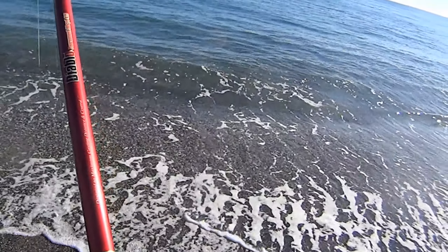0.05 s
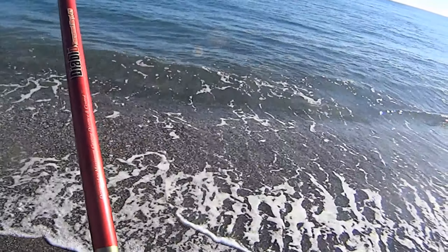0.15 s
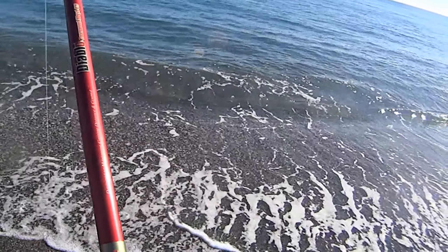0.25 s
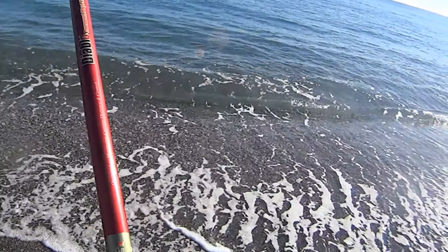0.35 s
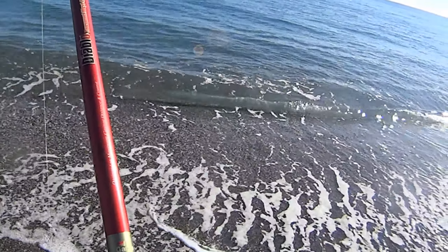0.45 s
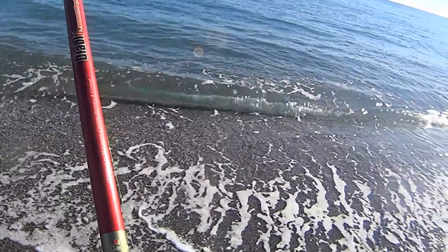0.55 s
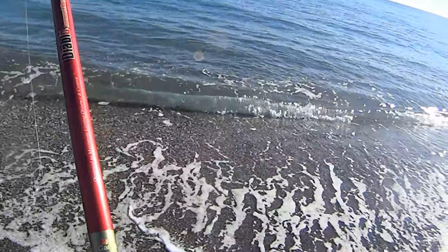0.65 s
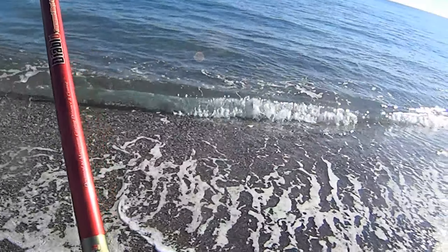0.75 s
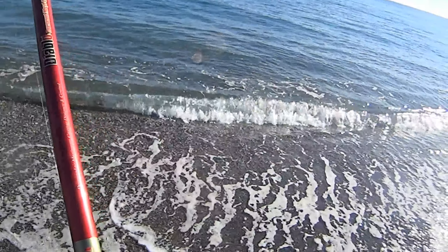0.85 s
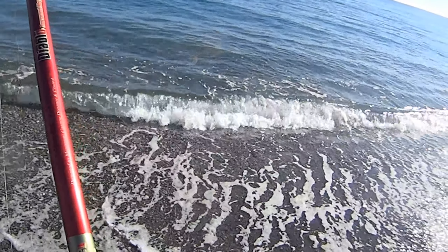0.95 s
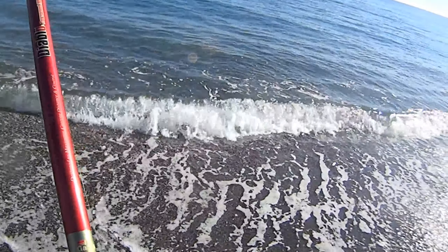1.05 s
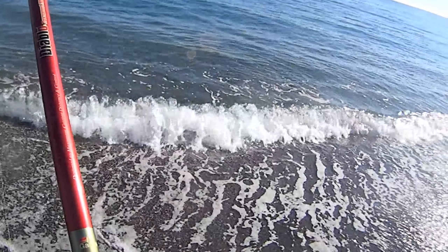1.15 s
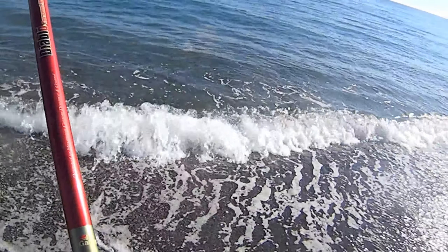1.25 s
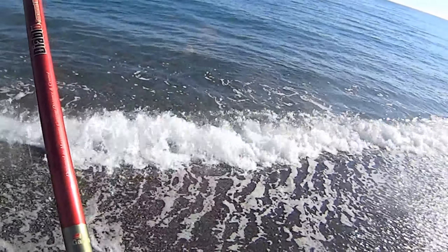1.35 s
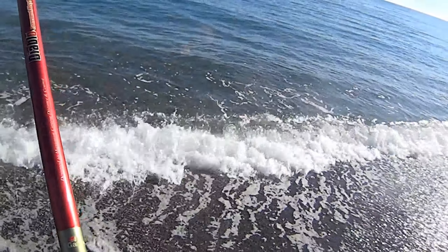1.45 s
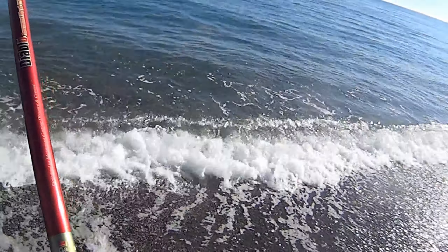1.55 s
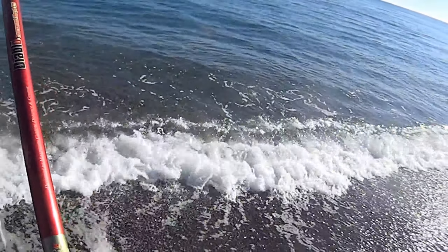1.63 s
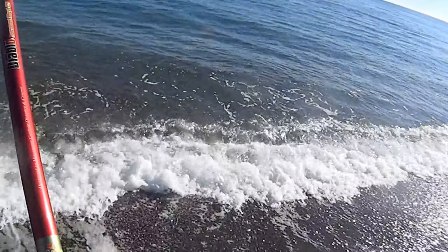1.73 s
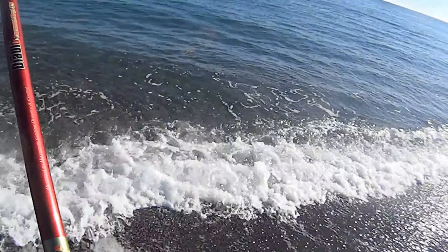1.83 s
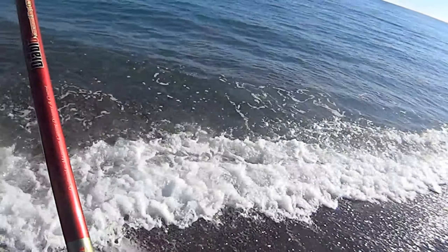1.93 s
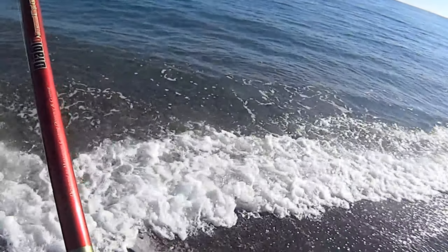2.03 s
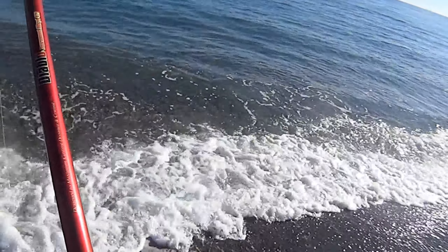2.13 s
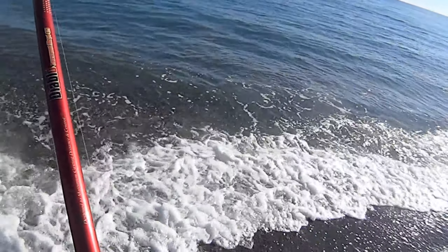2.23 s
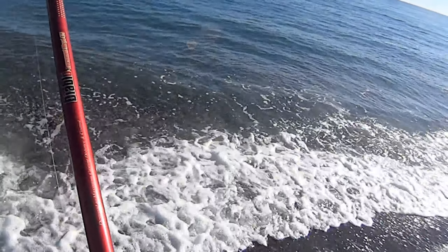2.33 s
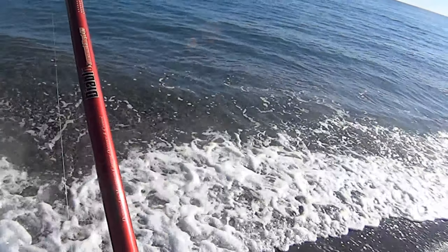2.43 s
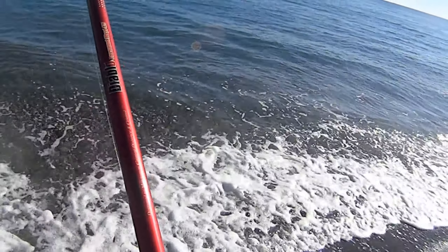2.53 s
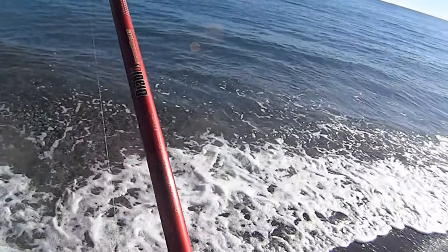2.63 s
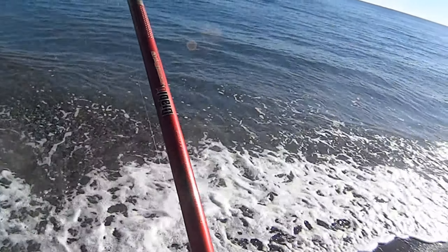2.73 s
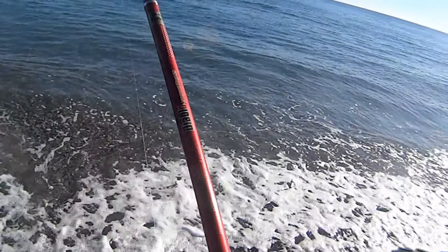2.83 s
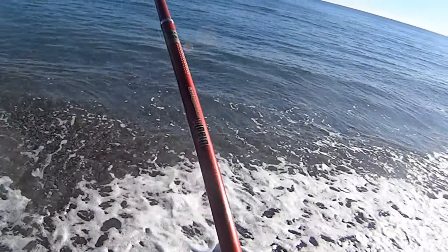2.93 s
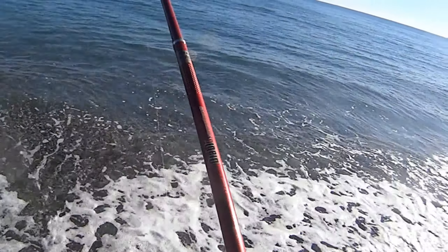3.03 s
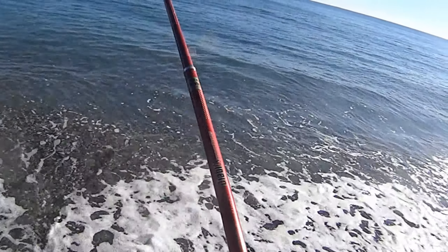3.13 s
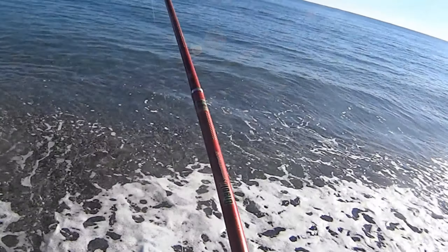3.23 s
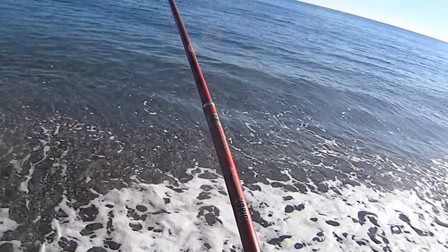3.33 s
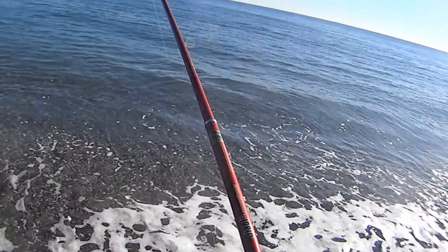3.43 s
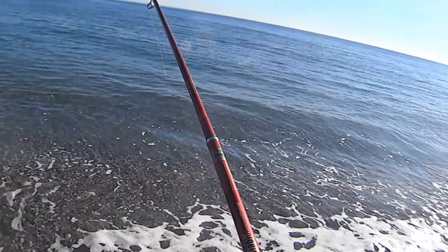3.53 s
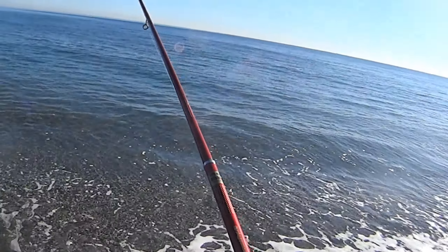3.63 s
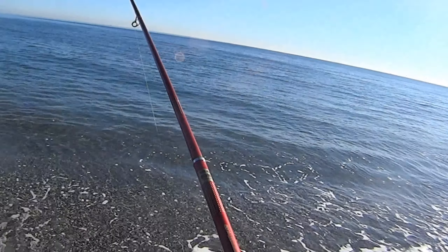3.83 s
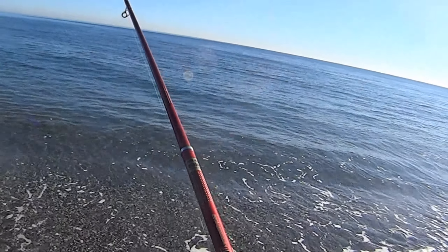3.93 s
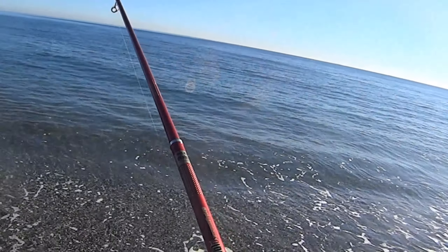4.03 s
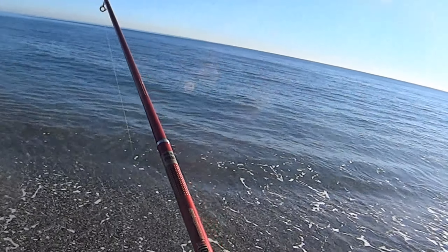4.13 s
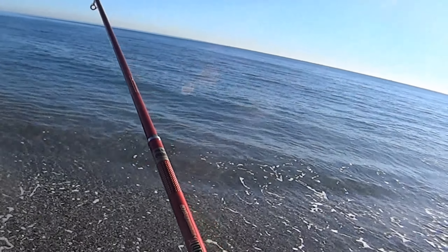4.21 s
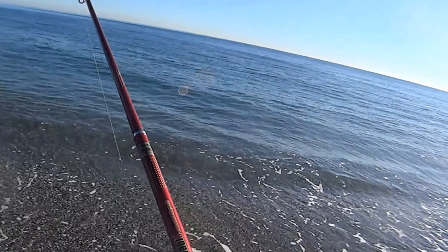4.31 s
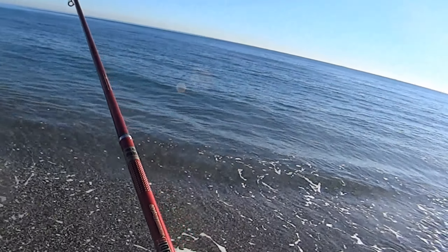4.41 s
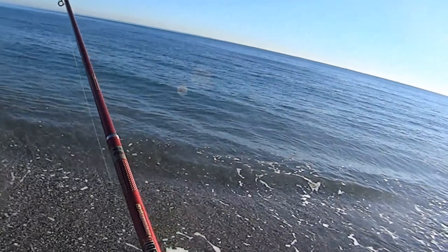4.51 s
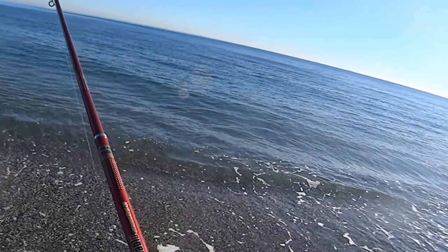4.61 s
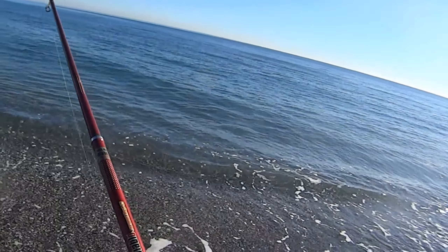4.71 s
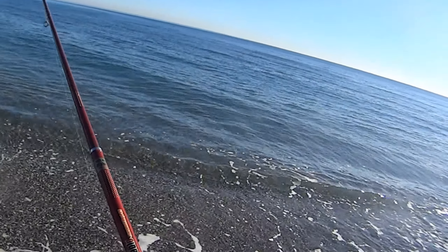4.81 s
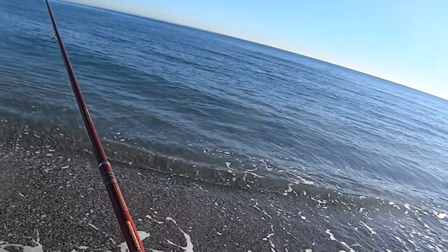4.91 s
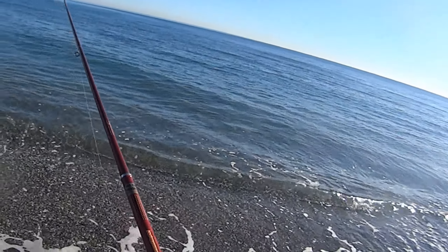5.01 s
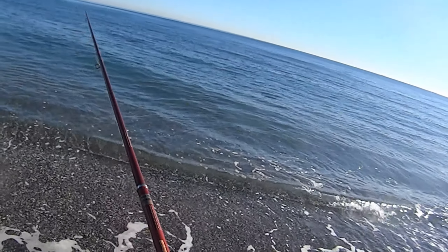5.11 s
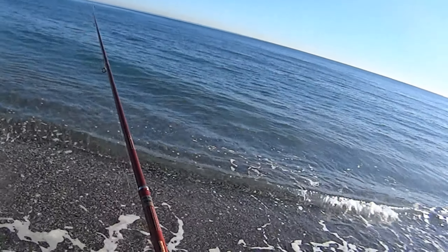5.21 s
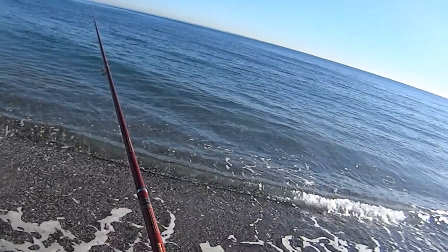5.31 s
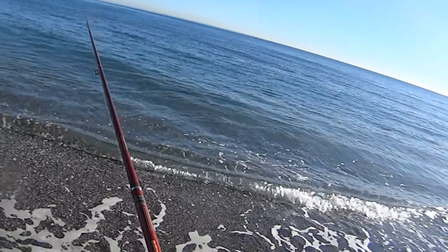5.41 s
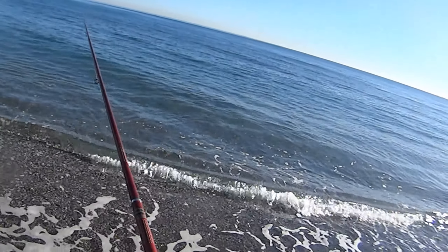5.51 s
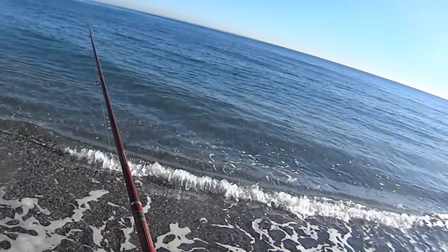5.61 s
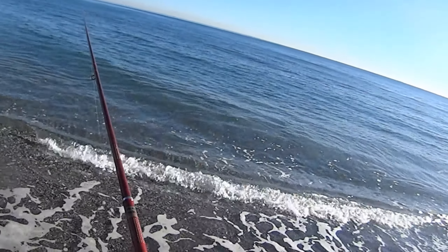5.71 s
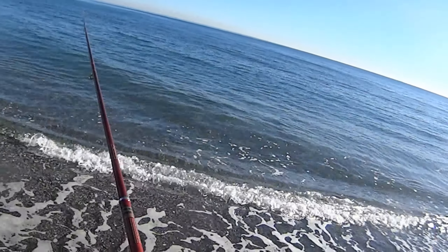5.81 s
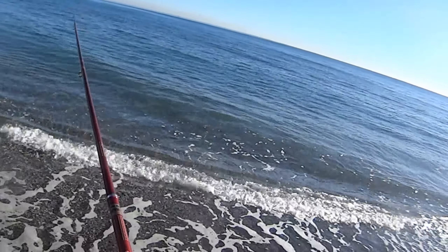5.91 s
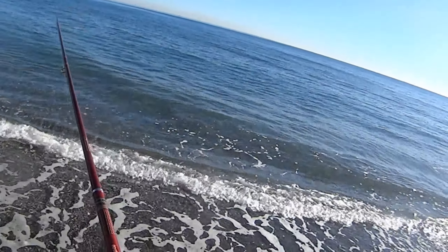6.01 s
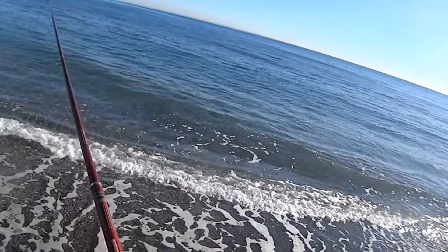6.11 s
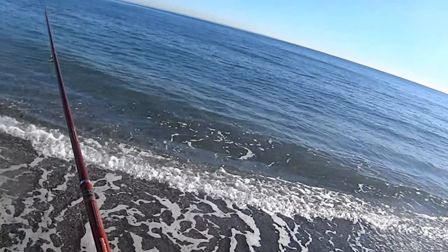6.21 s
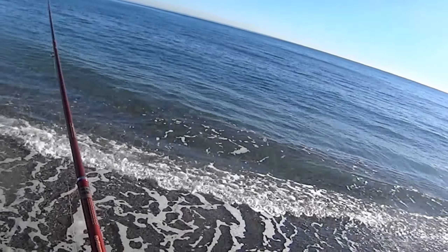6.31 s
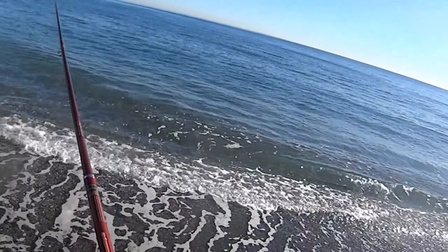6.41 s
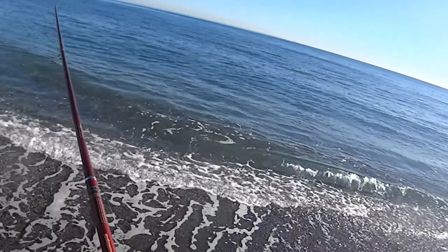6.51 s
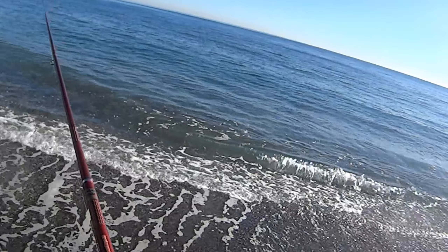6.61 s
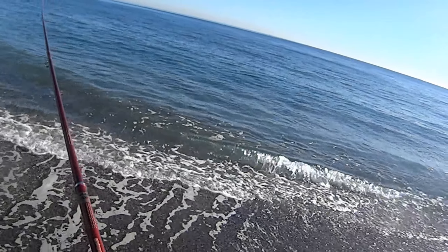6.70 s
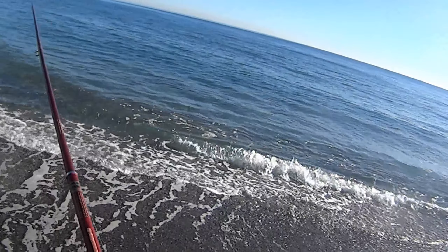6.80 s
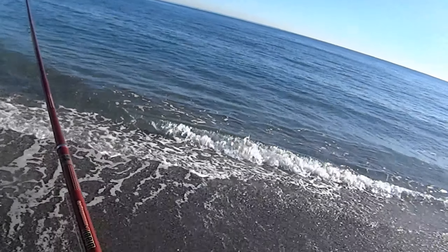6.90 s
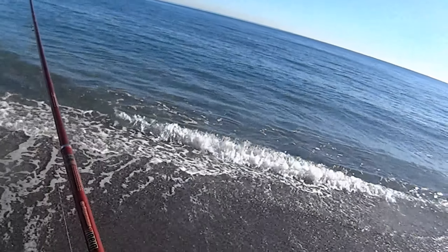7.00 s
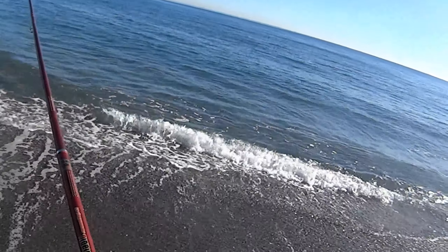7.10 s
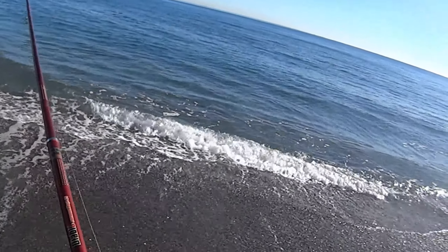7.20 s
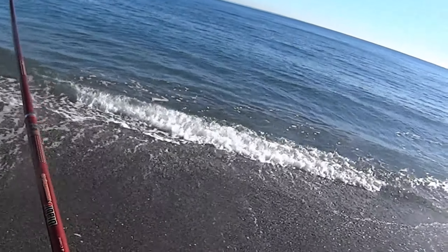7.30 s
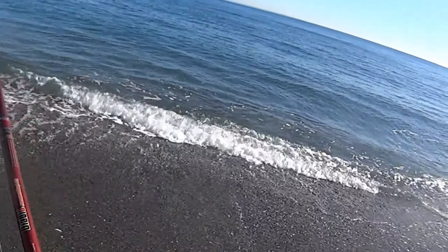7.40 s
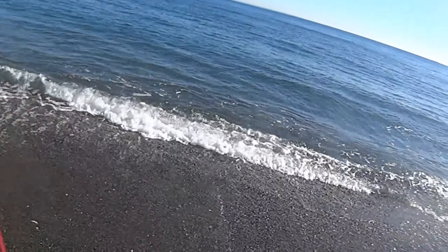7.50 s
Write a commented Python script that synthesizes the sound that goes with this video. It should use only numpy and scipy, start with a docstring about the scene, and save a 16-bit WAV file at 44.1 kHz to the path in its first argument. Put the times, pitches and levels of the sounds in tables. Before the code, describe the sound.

Close ratcheting reel clicks speed into a bright metallic whirr as one bigger wave, then gentler ones, wash and fizz on shingle.

```python
"""Small waves break on a shingle beach, one strong, then gentler ones, and drain back through the pebbles.
Their water is ringing bubbles and filtered noise; their foam and pebbles are dense random clicks.
Right by the microphones an angler winds in line: a ratchet of short noise bursts and spring pings,
slow at first, then a fast whirr. The tackle knocks now and then as clicks ringing a few modes.
The camera's housing adds a hollow ring; far sea and a light breeze on its two ports are filtered noise."""
import sys
import numpy as np
from scipy import signal
from scipy.fft import rfft, irfft, next_fast_len
from scipy.io import wavfile

SR = 44100
rng = np.random.default_rng(int(sys.argv[2]) if len(sys.argv) > 2 else 0)


def log_audio(samples):
    """Write samples as a 16-bit WAV file to the path given in sys.argv[1]."""
    # one column per channel
    frames = np.atleast_2d(samples).T
    # limit to full scale, then quantise
    limited = np.clip(frames, -1, 1)
    pcm = np.round(limited * 32767).astype(np.int16)
    wavfile.write(sys.argv[1], SR, pcm)


N = 332943
TIME = np.arange(N) / SR  # s
SIZE = next_fast_len(N + 8192, True)  # transform length, with room for filter tails
BINS = np.maximum(np.arange(SIZE // 2 + 1) * SR / SIZE, 1)  # Hz

# spectrum of the pawl on the teeth: [f/Hz, relative level/dB per Hz]
PAWL_SPECTRUM = [(1000, -27), (2300, -14), (3000, -3.5), (4400, -5), (5400, -3), (6400, 2), (7200, -4.5),
                 (8000, -9), (10600, -6), (11500, -16.5)]


def from_db(db):
    """Decibels to gain."""
    return 10 ** (np.asarray(db) / 20)


def rms_one(x):
    """Scale to rms 1, over both channels together."""
    return x / np.sqrt(np.mean(x ** 2) + 1e-20)


def in_time(rows):
    """The columns of a curve, read at every sample."""
    s, *columns = np.transpose(rows)
    return [np.interp(TIME, s, column) for column in columns]


def per_bin(points):
    """A table over log frequency, read at every bin."""
    hz, value = np.transpose(points)
    return np.interp(np.log(BINS), np.log(hz), value)


def colour(x, spectrum):
    """Causal (minimum-phase) filter with the given spectrum, by folding its cepstrum; rms 1."""
    cepstrum = irfft(np.log(from_db(per_bin(spectrum))), SIZE)
    cepstrum[1:SIZE // 2] *= 2
    cepstrum[SIZE // 2 + 1:] = 0
    response = np.exp(rfft(cepstrum))
    return rms_one(irfft(rfft(x, SIZE) * response, SIZE)[..., :N])


def noise_pair():
    """White noise as a (common, differing) pair of channels."""
    return rng.standard_normal((2, N))


def drift(rate):
    """Smooth chance of rms 1 that changes about `rate` times a second."""
    step = 40  # samples between the slow values
    r = np.exp(-2 * np.pi * rate * step / SR)
    slow = signal.lfilter([1], [1, -2 * r, r * r], rng.standard_normal(N // step + 2002))
    slow = rms_one(slow[2000:])  # the filter has settled
    return np.interp(np.arange(N) / step, np.arange(len(slow)), slow)


def ring(clicks, hz, t60):
    """A unit click sets a damped cosine ringing, falling 60 dB in t60 s, with little below its pitch."""
    r = from_db(-60 / (t60 * SR))
    w = 2 * np.pi * hz / SR
    return signal.lfilter([.5, 0, -.5], [1, -2 * r * np.cos(w), r * r], clicks + 1e-18)


def dying(strikes, decay_s):
    """Each strike starts an envelope that dies away exponentially at once."""
    return signal.lfilter([1], [1, -np.exp(-1 / (decay_s * SR))], strikes + 1e-18)


def clicks_at(times, sizes):
    """Single clicks at the given times."""
    places = np.clip(np.round(times * SR).astype(int), 0, N - 1)
    return np.bincount(places, sizes, N)


def grains(per_s, spread_db):
    """Random clicks, many small and few large, as a (common, differing) pair of steady power."""
    born = rng.random(N) < per_s / SR
    sizes = from_db(spread_db * np.minimum(rng.exponential(1, N), 4))
    return rms_one(born * sizes * noise_pair() / np.sqrt(per_s))


def far_sea():
    """The sea farther out is a steady low noise."""
    spectrum = [(30, -3.5), (90, -0.5), (200, -4.5), (500, -2.5), (1000, -2), (3000, -18)]  # far sea: [f/Hz, relative level/dB per Hz]
    return from_db(-61.0) * colour(noise_pair(), spectrum)


def breeze():
    """Light moving air rumbles on the ports, a very low noise that gusts."""
    # breeze on the ports, before the gusts: [t/s, level/dB]
    strength = [(0, -73), (4.1, -63.5), (5.5, -64), (6.6, -54)]
    # its rumble: [f/Hz, relative level/dB per Hz]
    spectrum = [(20, 6), (35, -5.5), (70, -18), (150, -17), (500, -54)]
    gusts_db = 2.5 * drift(6)
    return from_db(in_time(strength)[0] + gusts_db) * colour(noise_pair(), spectrum)


def housing(x):
    """The camera's shell and cavities resonate and lift a few bands."""
    # resonances of the housing: [f/Hz, width/Hz, lift/dB]
    resonances = [(1073, 40, 2), (1365, 105, 15.5), (2330, 160, 3.5), (3270, 960, 3.5), (5230, 650, 3.5)]
    for hz, width_hz, db in resonances:
        b, a = signal.iirpeak(hz, hz / width_hz, fs=SR)
        x = x + (from_db(db) - 1) * signal.lfilter(b, a, x)
    return x


def ports(pair):
    """Two ports hear the common part with their own level and phase, the differing part in opposite sign."""
    # likeness of the two ports: [f/Hz, likeness 0 to 1]
    likeness = [(40, 1), (400, 0.35), (700, 0.18), (1100, 0.56), (1380, 0.91), (1850, 0.15), (2500, 0.92),
                (3100, 1), (3550, 0.78), (5400, 0.87), (6500, 0.92), (7700, 0.56), (8500, 0.66),
                (11000, 0.74)]
    # level between the ports: [f/Hz, left minus right level/dB]
    balance = [(300, 0), (750, 1.5), (1400, -1), (2000, -1.3), (2600, -2), (3350, -6.5), (4400, -2),
               (6400, -3.5), (8000, -2), (11000, -2)]
    # phase between the ports: [f/Hz, lead of the left/rad]
    lead = [(100, -0.27), (380, -1.46), (600, -2.5), (1500, -0.98), (1900, -1.77), (3300, -1), (3600, -0.4),
            (7000, 0.6), (8200, -0.1)]
    common, differing = rfft(pair, SIZE)
    alike = np.clip(per_bin(likeness), 0, 1)
    lead_rad = per_bin(lead)
    sign = np.array([[1], [-1]])  # left, right
    both = np.sqrt((1 + alike) / 2) * common + sign * np.sqrt((1 - alike) / 2) * differing
    both = both * from_db(sign * per_bin(balance) / 2) * np.exp(.5j * sign * lead_rad)
    centre = np.sqrt((1 + alike * np.cos(lead_rad)) / 2)  # the sum of the two keeps its level
    return irfft(both / centre, SIZE)[:, :N]


def knocks():
    """The tackle clacks against the rod, ringing short modes; some contacts also set off a duller thud."""
    # contacts of the tackle: [t/s, strength/dB, thud against clack/dB]
    contacts = [(0.251, -33, -23), (2.0193, -11.5, -24), (2.0244, -7, -13), (4.608, -31, -2),
                (4.799, -23.5, 2.5), (4.8032, -34.5, -6), (6.0885, -17, -39), (6.91, -28, 3),
                (7.18, -31.5, 3.5), (7.434, -27.5, -2)]
    # modes of the clack, then of the thud: [f/Hz, level/dB, t60/s]
    clack_modes = [(1650, -8.5, 0.0061), (2440, 0.5, 0.0039), (2740, -18, 0.0036), (5500, -15, 0.0027)]
    thud_modes = [(330, -13, 0.0051), (570, -18, 0.011), (1096, -11, 0.028), (1300, -7, 0.02)]
    s, strength_db, thud_db = np.transpose(contacts)
    hard = clicks_at(s, from_db(strength_db))
    soft = clicks_at(s, from_db(strength_db + thud_db))
    clack = sum(ring(hard, hz, t60) * from_db(db) for hz, db, t60 in clack_modes)
    thud = sum(ring(soft, hz, t60) * from_db(db) for hz, db, t60 in thud_modes)
    small_and_blunt = signal.butter(2, [900, 7500], "band", fs=SR, output="sos")
    right = signal.sosfilt(small_and_blunt, clack) + thud
    left = np.interp(TIME - .00008, TIME, right)  # the left port hears it a little later
    return np.array([left, right])


def scrapes(strikes, decay_s):
    """Each strike of the pawl is a tiny burst of metallic chatter."""
    return dying(strikes, decay_s) * noise_pair()


def catches():
    """Now and then the pawl snaps down harder and shorter."""
    # hard catches of the pawl: [t/s, relative level/dB]
    snaps = [(0.0173, -23.5), (0.407, -30), (0.5030, -22), (4.353, -22), (4.578, -28), (7.3677, -18),
             (7.4784, -11), (7.4887, -18)]
    s, snap_db = np.transpose(snaps)
    bursts = scrapes(clicks_at(s, from_db(snap_db)), decay_s=0.0017)
    return from_db(-60.5) * colour(bursts, PAWL_SPECTRUM)


def reel():
    """The pawl drops off one tooth after another, weak or strong; its spring pings along."""
    # winding speed: [t/s, mean rate/ticks per s]
    winding = [(0.0, 54), (0.97, 75.1), (1.95, 76), (2.08, 76.1), (2.39, 88.2), (2.59, 112), (2.82, 122),
               (3.26, 119), (3.59, 133), (3.81, 123), (4.0, 130), (4.18, 111), (4.75, 119), (5.0, 145),
               (5.23, 148), (5.49, 165), (5.78, 212), (6.33, 171), (6.52, 184), (6.9, 168), (7.04, 180),
               (7.55, 172)]
    # how hard the pawl bears on the teeth: [t/s, level/dB]
    pressure = [(0, -2), (.24, 1.5), (.55, 1), (.78, 5), (2.35, 0.5), (2.7, 1.5), (3.3, 1.5), (3.75, -1.2),
                (4.6, -3), (5.3, 0), (5.85, 2), (6.2, -0.5), (7.5, 0.3)]
    # louder with speed: reference at 100 ticks per s ahead of the mix below, and gain per doubling
    reference_db, db_per_octave = -45.5, 4
    ping_follows = 0.95  # a harder pawl rings its spring more: extra dB per dB of pressure

    per_s, pressure_db = in_time(winding)[0], in_time(pressure)[0]
    level_db = reference_db + db_per_octave * np.log2(per_s / 100) + pressure_db
    per_s = per_s + .07 * (per_s - per_s.min()) * drift(10)  # the hand is less even when fast
    teeth = np.flatnonzero(np.diff(np.floor(np.cumsum(per_s) / SR)))
    late, hard, sharp, springy = rng.standard_normal((len(teeth), 4)).T
    times = TIME[teeth] + 0.00027 * late
    force = from_db(level_db[teeth]) / np.sqrt(per_s[teeth])

    # the body and the bright edge of a tick vary each on their own
    body = scrapes(clicks_at(times, force * from_db(1.8 * hard)), decay_s=.002)
    edge = scrapes(clicks_at(times, force * from_db(1.6 * sharp)), decay_s=.0022)
    low, high = (signal.butter(4, 7500, kind, fs=SR, output="sos") for kind in ("low", "high"))
    chatter = colour(signal.sosfilt(low, body) + signal.sosfilt(high, edge), PAWL_SPECTRUM)

    spring_hz = 5950 * np.exp(0.071 * drift(22))  # the pitch wanders from tooth to tooth
    ping_force = force * from_db(2.4 * springy + ping_follows * pressure_db[teeth])
    swell = dying(clicks_at(times, ping_force), decay_s=0.0014)
    swell = dying(swell, decay_s=0.00082)  # the second decay rounds the onset
    tone = np.sin(2 * np.pi * np.cumsum(spring_hz) / SR)
    ping = rms_one(swell * tone) * np.array([[1], [0]])  # common part only
    loudness = np.sqrt(np.mean(from_db(level_db) ** 2))
    return (from_db(-3.5) * chatter + from_db(-5.5) * ping) * loudness


def gulps():
    """Big pockets of air gulp as a crest folds: each swells and rings briefly under the water."""
    # gulps: [t/s, f/Hz, peak level/dB]
    pockets = [(1.80, 241, -47), (5.263, 248, -50), (5.774, 268, -46.5), (6.695, 412, -48.5)]
    out = 0
    for s, hz, peak_db in pockets:
        age = np.maximum(TIME - s, 0)
        swell = age * hz / 1.8  # fullest after 1.8 cycles
        out = out + from_db(peak_db) * swell * np.exp(1 - swell) * np.sin(2 * np.pi * hz * age)
    return out


def arch(age, length_s):
    """Half a sine: a crest folds over, bit by bit, and runs out."""
    return np.sin(np.pi * np.clip(age / length_s, 0, 1))


def build_and_fade(age, build_s, fade_db_per_s):
    """A steady rise to 1, then a steady loss of decibels."""
    return np.clip(age / build_s, 0, 1) * from_db(-fade_db_per_s * np.maximum(age - build_s, 0))


def surf():
    """Gains of plunge, splash and fizz: each wave ripples in, breaks, runs up, leaves foam; powers add."""
    # crests, each one arch of sound, with levels ahead of the mix: [start t/s, length/s, approach ripple
    # level/dB, plunge of trapped air level/dB, splash level/dB, fizz level/dB, foam left behind level/dB]
    crests = [(0.51, 1.88, -52.5, -51.5, -38.5, -29, -38.5), (5.076, 1.22, -47.5, -58.5, -43.5, -37, -41),
              (6.535, 0.86, -48.5, -57.5, -44.5, -39, -41), (7.362, 0.42, -53, -63, -43, -37.5, -43)]
    drain_gurgle_db, drain_fizz_db = -67, -53  # water always drains through the pebbles
    # a coming wave ripples over the shallows, louder until it breaks, and the pebbles it stirs fizz
    ripple_rise_db_per_s, ripple_fizz_db = 13, 4
    plunge_lag_s = 0.13  # air is trapped once the crest has folded over
    # the broken wave runs up the beach, splashing less than at the crest and soon over
    swash_db, swash_fade_db_per_s = -8.5, 42
    # foam is thickest just after the break and then bursts away
    foam_lag_s, foam_fade_db_per_s = 0.18, 9

    plunge, splash, fizz = from_db(drain_gurgle_db) ** 2, 0, from_db(drain_fizz_db) ** 2
    for start, length_s, ripple_db, plunge_db, splash_db, fizz_db, foam_db in crests:
        age = TIME - start
        breaking = arch(age, length_s)
        trapping = arch(age - plunge_lag_s, length_s) ** 1.08
        ripple = from_db(ripple_db + ripple_rise_db_per_s * np.minimum(age, 0))
        ripple = ripple * np.clip(1 - age / length_s, 0, 1)
        swash = from_db(splash_db + swash_db) * build_and_fade(age, length_s, swash_fade_db_per_s)
        foam = from_db(foam_db) * build_and_fade(age, length_s + foam_lag_s, foam_fade_db_per_s)
        plunge = plunge + (from_db(plunge_db) * trapping) ** 2
        splash = splash + ripple ** 2 + (from_db(splash_db) * breaking) ** 2 + swash ** 2
        fizz = fizz + (from_db(ripple_fizz_db) * ripple) ** 2
        fizz = fizz + (from_db(fizz_db) * breaking) ** 2 + foam ** 2
    return np.sqrt(plunge), np.sqrt(splash), np.sqrt(fizz)


def bubbles(per_s, low_hz, high_hz, cycles, spread_db, count):
    """Bubbles of many sizes, each falling 60 dB in some cycles of its own pitch."""
    births, dealt = grains(per_s, spread_db), rng.integers(0, count, N)
    out = 0
    for k, hz in enumerate(np.geomspace(low_hz, high_hz, count)):
        out = out + ring(births * (dealt == k), hz, cycles / hz) * hz
    return rms_one(out)


def waves():
    """The crest traps big bubbles, splashes small ones, and leaves foam fizzing over clicking pebbles."""
    # spectra of trapped air, splash, and foam with pebbles: [f/Hz, relative level/dB per Hz]
    plunge_spectrum = [(50, -17.5), (130, -4), (260, 1.5), (450, 0), (700, -6.5), (1200, -23)]
    splash_spectrum = [(300, -7), (700, -4.5), (1100, 2), (1600, -2), (2200, -5.5), (3000, 0.5),
                       (5000, -33.5)]
    fizz_spectrum = [(1000, -24.5), (2000, -13), (2550, -11), (3000, -1), (3800, 0.5), (4700, -0.5),
                     (6300, 0.5), (7100, -4), (8000, -7), (9500, -11), (11000, -18)]
    # the first wave peels from right to left: [t/s, left minus right level/dB]
    peel = [(.7, -0.9), (1.3, 0), (2.2, 2), (3.0, 0.3)]
    plunge_gain, splash_gain, fizz_gain = surf()

    big = bubbles(per_s=1100, low_hz=112.5, high_hz=800, cycles=17.7, spread_db=2.0, count=14)
    lumps_db = 0.36 * drift(12)  # air is trapped in lumps
    plunge = colour(big + .7 * noise_pair(), plunge_spectrum) * plunge_gain * from_db(lumps_db - 3.0)

    small = bubbles(per_s=3500, low_hz=607, high_hz=3800, cycles=8.6, spread_db=2.0, count=14)
    slosh_db = .7 * drift(10)
    splash = colour(small + 1.46 * noise_pair(), splash_spectrum) * splash_gain * from_db(slosh_db - 7.5)

    # a stronger wash bursts more foam and rolls more pebbles
    busy_per_s = 5000 * (fizz_gain / np.median(fizz_gain)) ** .7
    foam = grains(busy_per_s, spread_db=0.5) + 1.2 * noise_pair()
    fizz = colour(foam, fizz_spectrum) * fizz_gain * from_db(0.55 * drift(26) - 0.74)

    lean = from_db(np.array([[1], [-1]]) * in_time(peel)[0] / 2)
    return ports(housing(plunge + splash + fizz)) * lean


def scene():
    """Waves, far sea, breeze and reel reach the ports through the housing; gulps and knocks stand out."""
    through_housing = ports(housing(far_sea() + breeze() + reel() + catches()))
    return through_housing + knocks() + gulps() + waves()


def record(dry):
    """The treble is cut steeply above 11 kHz."""
    cut = signal.ellip(12, .1, 85, 11000, fs=SR, output="sos")
    return signal.sosfilt(cut, dry)


dry = scene()
out = record(dry)
log_audio(out)
```